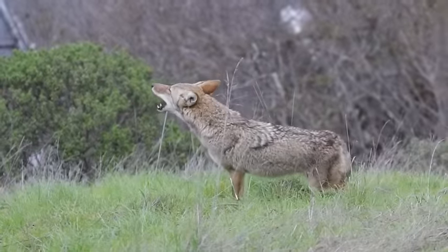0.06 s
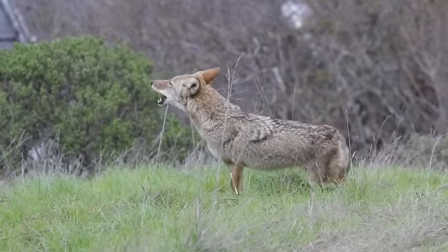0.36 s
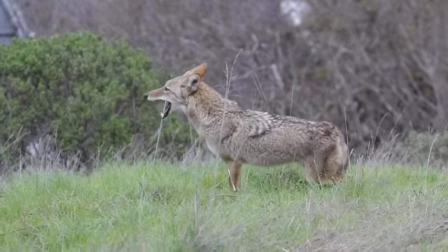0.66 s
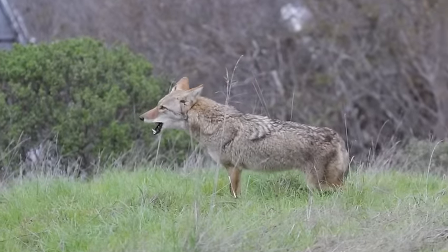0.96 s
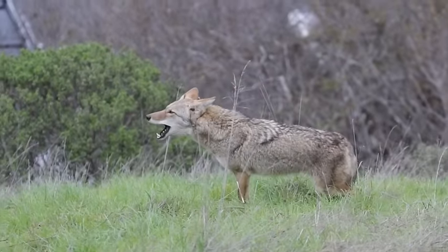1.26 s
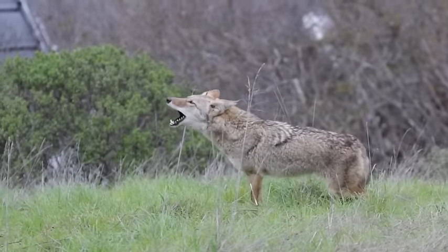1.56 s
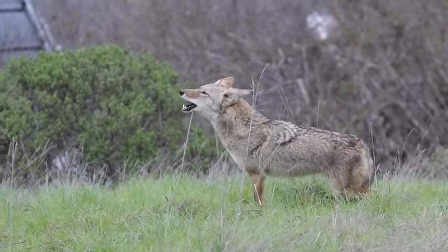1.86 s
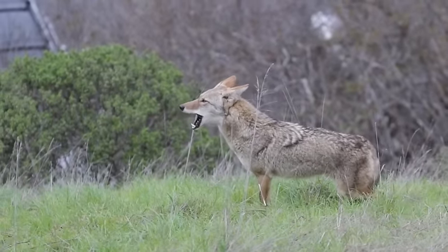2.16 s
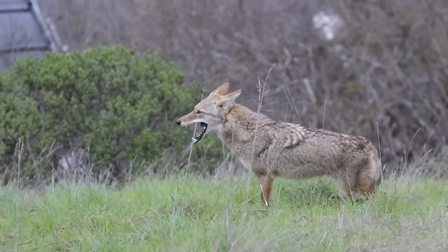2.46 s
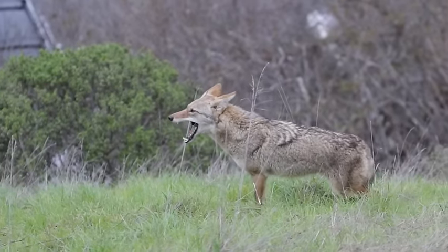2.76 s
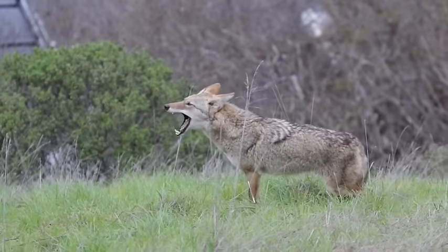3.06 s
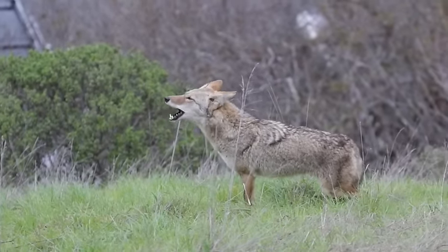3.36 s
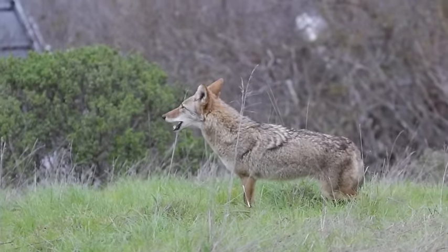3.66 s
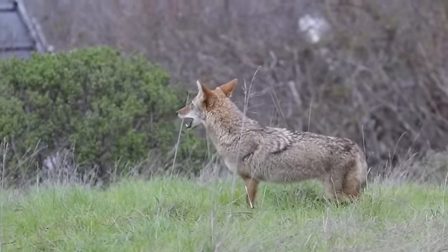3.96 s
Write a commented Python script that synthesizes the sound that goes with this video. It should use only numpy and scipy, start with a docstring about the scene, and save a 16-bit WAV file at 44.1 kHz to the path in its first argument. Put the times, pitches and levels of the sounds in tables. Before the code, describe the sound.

Two coyotes call in a meadow. The near one slides again and again from low howls up into high, arching yips, while the other holds lower, wavering, sometimes raspy howls. Trees return a soft echo over faint background noise.

```python
"""Two coyotes in a meadow

The near one slides from low howls up into pure, arched yips that break downwards; its partner holds
lower, wavering howls, some beginning in a rasp. Each voice is a stack of harmonics from the vocal
folds, coloured by throat and mouth, with breathy growls and thin squeaks. Trees return a soft echo,
a few dry ticks sound close by, and a far wail, a low rumble and a faint hum lie underneath."""
import sys
import numpy as np
from scipy import signal
from scipy.fft import rfft, irfft
from scipy.io import wavfile
from scipy.ndimage import uniform_filter1d

SR = 44100
rng = np.random.default_rng(int(sys.argv[2]) if len(sys.argv) > 2 else 0)


def generate_wav(sig):
    """Save sig (samples, or channels by samples) to the path in sys.argv[1] as 16-bit PCM at SR."""
    pcm = np.round(np.clip(np.atleast_2d(sig).T, -1, 1) * 32767).astype(np.int16)
    wavfile.write(sys.argv[1], SR, pcm)


N = 176400
T = np.arange(N) / SR
CUTOFF_HZ = 15850


def from_db(db):
    """Decibels to gain."""
    return 10 ** (np.asarray(db) / 20)


def rms_one(x):
    """Scale to unit power."""
    return x / np.sqrt(np.mean(x ** 2) + 1e-20)


def at_hz(colour, hz):
    """Read an EQ curve in dB on a log-frequency axis."""
    f, db = np.transpose(colour)
    return np.interp(np.log(hz + 1e-9), np.log(f), db)


def noise(colour):
    """Unit-power noise through an EQ curve, rolled off beyond its ends."""
    hz = np.arange(N // 2 + 1) * SR / N
    roll_off = np.minimum(hz / colour[0][0], 1) ** 2 / np.maximum(hz / colour[-1][0], 1) ** 4
    return rms_one(irfft(rfft(rng.standard_normal(N)) * from_db(at_hz(colour, hz)) * roll_off, N))


def drift(rate_hz):
    """Random modulator of spread 1, up to a given rate."""
    hz = np.arange(N // 2 + 1) * SR / N
    return rms_one(irfft(rfft(rng.standard_normal(N)) / (1 + (hz / rate_hz) ** 4), N))


def gate(start, end, edge_s):
    """One between two times, with soft edges."""
    return np.clip(np.minimum(T - start, end - T) / edge_s + .5, 0, 1)


def glide(times, values, t):
    """A control curve with rounded corners."""
    return uniform_filter1d(np.interp(t, times, values), size=220, mode="nearest")


def phase_of(hz):
    """Running phase of an oscillator that follows a pitch curve."""
    return 2 * np.pi * np.cumsum(hz) / SR


# EQ of the rumble and of the open air: f/Hz, level/dB
RUMBLE_EQ = [(15, -65), (25, -25.5), (64, -3), (161, 0.5), (210, -2), (349, -2), (450, -16), (580, -60),
             (990, -120)]
AIR_EQ = [(200,-14.5),(450,-1.5),(1200,7),(2000,-3),(3500,-14.5),(4300,-27),(7000,-29),(10000,-35.5),(15500,-37)]
def background(rumble_db=-42, hum_hz=166, hum_db=-52.5, air_db=-37):
    """The bed: distant rumble, a wavering hum and the hiss of open air."""
    hum = np.sqrt(2) * np.sin(phase_of(hum_hz + 3 * drift(1.8)))
    hum *= 1 + 0.6 * drift(1.2)
    return from_db(rumble_db) * noise(RUMBLE_EQ) + from_db(hum_db) * hum + from_db(air_db) * noise(AIR_EQ)


# Contour of the wail: t/s, f/Hz, level/dB
WAIL_CONTOUR = [(0.601,1398,-30.5),(1.35,1586,-37),(1.7,1685,-34.5),(1.969,1645,-29.5),(2.618,1338,-33.5),(2.998,1205,-36.5),(3.298,1080,-40.5),(4,952,-28.5)]
def far_wail():
    """One slow tone, blurred and fading in and out over the distance."""
    times, hz, db = np.transpose(WAIL_CONTOUR)
    phase = phase_of(np.interp(T, times, hz))
    blurred = drift(34) * np.sin(phase) + drift(3.3) * np.cos(phase)
    return gate(times[0], np.inf, edge_s=.2) * from_db(np.interp(T, times, db)) * blurred


# Tick cues: t/s, level/dB
TICK_CUES = [(0.29,-15.5),(0.3181,-11.5),(0.695,-14),(0.717,-17.5)]
# EQ of a tick: f/Hz, level/dB
TICK_EQ = [(1000,-21),(2500,9),(4000,-4.5),(6000,-3),(9000,-5),(15000,-27)]
def ticks(decay_s=0.00094):
    """Bright snaps of noise with an instant attack and a very short decay."""
    envelope = sum(from_db(db) * (T >= t) * np.exp(-np.abs(T - t) / decay_s) for t, db in TICK_CUES)
    return noise(TICK_EQ) * envelope


# EQ of the echo tail: f/Hz, level/dB
ECHO_EQ = [(300,0),(700,-2),(1300,-5.5),(1900,-1.5),(2600,-4.5),(3600,-7),(5000,2),(12000,-11)]
def tree_echo(voices, wet_db=-23.5, t60_s=2, build_s=0.0083):
    """Scattered echoes from the edge of the wood swell and die away."""
    tail = noise(ECHO_EQ) * from_db(-60 * T / t60_s) * (1 - np.exp(-T / build_s))
    return from_db(wet_db) * signal.fftconvolve(voices, rms_one(tail) / np.sqrt(N))[:N]


# Squeak cues: start t/s, end t/s, first f/Hz, last f/Hz, level/dB
SQUEAK_CUES = [(0.903,0.991,4950,4510,-50), (2.274,2.553,7697,7270,-64), (2.927,3.02,6766,6400,-49.5),
               (3.805,3.838,5226,6680,-40.5)]
def squeaks(octave_db=-2.5, flicker_db=9.0):
    """A second, whistling pitch slides high above the howls; the lower squeaks carry an octave."""
    waver = 1 + 0.0037 * drift(100)
    out = np.zeros(N)
    for start, end, first_hz, last_hz, db in SQUEAK_CUES:
        phase = phase_of(np.interp(T, [start, end], [first_hz, last_hz]) * waver)
        octave = from_db(octave_db) * (last_hz < 6000) * np.sin(2 * phase)
        out += gate(start, end, edge_s=0.021) * from_db(db) * (np.sin(phase) + octave)
    return out * from_db(flicker_db * drift(30))


# Growl cues: start t/s, end t/s, level/dB, pulse f/Hz, sizzle trim/dB
GROWL_CUES = [(0.591,0.949,-31.5,140,2),(0.984,1.031,-26,150,-13.5),(1.123,1.143,-21.5,206,-11),(1.625,1.694,-34.5,133,5),(1.87,1.946,-16.5,150,-2),(3.384,3.425,-19.5,220,3)]
# EQ of the growl's body and of the sizzle on top: f/Hz, level/dB
GROWL_EQ = [(400,-17),(650,-2.5),(900,-17),(1150,2.5),(1400,-2.5),(1750,-0.5),(2050,-7.5),(2500,-37),(3600,-37.5)]
SIZZLE_EQ = [(4600,-20),(5700,8.5),(6900,-9),(8000,-18),(9500,-20),(13000,-28)]
def growls(throb_depth=0.28, sizzle_db=-27):
    """Slow, uneven flaps of the folds let puffs of air through the throat."""
    body, sizzle = noise(GROWL_EQ), noise(SIZZLE_EQ)
    uneven = 1 + 0.1182 * drift(64.3)
    out = np.zeros(N)
    for start, end, db, pulse_hz, trim_db in GROWL_CUES:
        puffs = 1 + throb_depth * np.cos(phase_of(pulse_hz * uneven))
        air = body + from_db(sizzle_db + trim_db) * sizzle
        out += gate(start, end, edge_s=0.036) * from_db(db) * puffs * air
    return out


FALSETTO_HZ, TREBLE_HZ, PURITY_DB_PER_OCTAVE = 1100, 3900, -3.5
RASP_EDGE_S, RASP_JITTER, RASP_THROB = 0.0098, 0.077, 0.58
FLUTTER_DB, SHIMMER_DB, BLUR_RAD, BREATH_DB = 5, 1.5, 0.31, -42
BREAK_HZ_PER_S, BREAK_MID_DB, BREAK_TREBLE_DB = 10000, 6.5, 2.5
# EQ of the air in the throat and of the breathy edge over the voice: f/Hz, level/dB
HISS_EQ = [(300,-50.5),(700,-8),(1300,24),(1900,-15.5),(2600,3.5),(3600,-8.5),(4400,-45),(6500,-17),(9500,-19),(15000,-62.5)]
BREATH_EQ = [(4600,-25),(5600,-8),(6700,3.5),(7800,-3.5),(9800,-8),(11000,-24.5),(15500,-26)]
def coyote_voice(calls, presses, rasps, throat, overtone_ride,
                 level_db, upper_db, tilt_db_per_octave, falsetto_db, jitter, hiss_db):
    """Vocal folds give a harmonic stack; in a rasp they jitter and throb every third cycle."""
    rough = np.clip(sum(amount * gate(start, end, RASP_EDGE_S) for start, end, amount, _ in rasps), 0, 1)
    fader_db = level_db + sum(db * gate(start, end, RASP_EDGE_S) for start, end, _, db in rasps)
    wobble = 1 + (jitter + RASP_JITTER * rough ** 2) * drift(269)
    flutter = [FLUTTER_DB * drift(19) for _ in range(7)]
    shimmer = [SHIMMER_DB * drift(200) for _ in range(3)]
    blur = [BLUR_RAD * drift(280) for _ in range(5)]
    breath = from_db(BREATH_DB) * noise(BREATH_EQ)
    hiss = from_db(hiss_db) * noise(HISS_EQ)
    throb_slip = drift(40)
    out = np.zeros(N)
    for call, (press_mid_db, press_treble_db) in zip(calls, presses):
        times, *curves = np.transpose(call)
        fade = gate(times[0], times[-1], edge_s=.006)
        on = fade > 0
        hz, fundamental_db, octave_db = (glide(times, curve, T[on]) for curve in curves)
        phase = phase_of(hz * wobble[on])
        effort = np.hypot(from_db(fundamental_db), from_db(octave_db))
        airflow = effort * (1 + np.cos(phase))  # one puff per cycle
        falsetto = 1 / (1 + (FALSETTO_HZ / hz) ** 8)
        tilt = tilt_db_per_octave + PURITY_DB_PER_OCTAVE * falsetto  # steeper in falsetto
        # A fast downward break of pitch brightens the voice.
        breaking = np.clip(-np.gradient(hz) * SR / BREAK_HZ_PER_S, 0, 1)
        mid_db = press_mid_db + np.interp(T[on], *np.transpose(overtone_ride)) + BREAK_MID_DB * breaking
        treble_db = press_treble_db + BREAK_TREBLE_DB * breaking
        voice = from_db(fundamental_db) * np.sin(phase) + from_db(octave_db) * np.sin(2 * phase)
        voice += airflow * breath[on] * (1 - falsetto) * (1 + breaking)
        for k in range(3, 25):
            treble = 1 / (1 + (TREBLE_HZ / (k * hz)) ** 12)  # crossover: 0 in the mids, 1 on top
            db = upper_db + falsetto_db * falsetto + at_hz(throat, k * hz) + tilt * np.log2(k / 3)
            db += flutter[k % 7][on] + mid_db * (1 - treble) + (treble_db + shimmer[k % 3][on]) * treble
            gain = effort * from_db(np.minimum(db, 0)) * (k * hz < CUTOFF_HZ)
            smear = treble * blur[k % 5][on] * (1 + breaking)
            voice += gain * np.sin(k * phase + smear)
        throb = 1 + RASP_THROB * rough[on] * np.cos(phase / 3 + throb_slip[on])
        out[on] += fade[on] * (np.sqrt(2) * voice * throb + airflow * hiss[on])
    return out * from_db(fader_db)


# The partner's howls: t/s, f/Hz, fundamental level/dB, octave level/dB
REPLY_1 = [(0.07, 615, -35, -25), (0.1, 682.4, -47, -22.5), (0.168, 672.7, -25.5, -25),
           (0.21, 831.7, -40.5, -30.5), (0.258, 724.7, -32, -20.5), (0.31, 798.5, -34, -21),
           (0.34, 863.5, -24.5, -19.5), (0.372, 771, -23.5, -25), (0.45, 747.4, -23, -23.5),
           (0.464, 782, -23, -20), (0.48, 925, -29.5, -13.5), (0.5, 917, -24.5, -18.5),
           (0.512, 915, -28, -15), (0.52, 796, -20, -18), (0.546, 817, -23, -20.5),
           (0.556, 721.5, -45.5, -25), (0.632, 721, -37.5, -36.5), (0.65, 714, -43, -21)]
REPLY_2 = [(0.6, 483, -48, -42.5), (0.633, 468.8, -38.5, -30), (0.646, 537.8, -29.5, -49),
           (0.656, 525.5, -31.5, -24), (0.669, 520.2, -45, -39.5), (0.693, 479, -35.5, -30),
           (0.768, 491.5, -42, -28), (0.789, 549.3, -35.5, -42.5), (0.813, 496, -41, -30),
           (0.834, 499, -49, -41), (0.848, 551.7, -38.5, -32.5), (0.882, 568.7, -40, -26.5),
           (0.918, 600.6, -38.5, -33), (0.937, 550, -35.5, -23.5), (0.978, 597, -30.5, -23),
           (0.996, 701, -46, -17), (1.023, 679.6, -47, -18), (1.064, 636, -36, -28.5),
           (1.085, 624.3, -36, -15), (1.14, 458.2, -51, -30)]
REPLY_3 = [(2.072, 621, -34.5, -22), (2.082, 587.8, -33.5, -23.5), (2.13, 578.7, -45, -31),
           (2.184, 608.6, -45.5, -20.5), (2.223, 663.4, -24.5, -22.5), (2.271, 517.6, -37.5, -25),
           (2.31, 484, -47.5, -39), (2.354, 543.6, -43, -35.5), (2.364, 515, -46, -34),
           (2.383, 548, -38, -27.5), (2.4, 586, -35, -44), (2.434, 589.6, -39.5, -30),
           (2.487, 629, -35, -35.5), (2.511, 626, -40, -19), (2.57, 440, -57.5, -41.5)]
REPLY_4 = [(3.36, 475.3, -42, -39), (3.392, 574, -40, -26.5), (3.414, 666.5, -26.5, -25.5),
           (3.496, 761.2, -32, -21), (3.545, 814.6, -22.5, -19.5), (3.605, 892, -29.5, -24.5),
           (3.672, 951, -36, -38), (3.798, 848.5, -23.5, -24.5), (3.848, 888, -22.5, -26),
           (3.888, 985, -20.5, -34), (3.932, 1101, -24, -45), (3.957, 966, -49, -54),
           (3.989, 889, -38, -31), (4.0, 899, -16, -41)]
# How hard each howl is pressed: mid level/dB, treble level/dB
PARTNER_PUSH = [(6,1.5),(-11.5,7.5),(-4,-11),(4.5,-22)]
# Rasp cues: start t/s, end t/s, roughness/0-1, level/dB
PARTNER_RASP_CUES = [(0.598,0.95,0.94,1), (0.987,1.033,0.8,2.5), (3.368,3.411,0.55,1)]
# Throat and mouth EQ on the upper partials: f/Hz, level/dB
PARTNER_EQ = [(1200,7.5),(1800,-2.5),(2400,-16),(3000,-24),(3800,-37.5),(4600,-66),(5700,-35.5),(7000,-24),(8000,-36),(10000,-36),(12000,-63.5),(15500,-73)]
# Dip and lift of the mid overtones: t/s, level/dB
PARTNER_RIDE = [(.97,-1),(1.01,-11.5),(1.051,6.5),(2.0,0.5),(2.09,18.5),(2.17,20),(2.26,-2)]
def partner_coyote():
    """Lower, wavering howls with more jitter in the folds and more air in the throat."""
    howls = [REPLY_1, REPLY_2, REPLY_3, REPLY_4]
    return coyote_voice(howls, PARTNER_PUSH, PARTNER_RASP_CUES, PARTNER_EQ, PARTNER_RIDE,
                        level_db=1, upper_db=-0.5, tilt_db_per_octave=-10.5, falsetto_db=12,
                        jitter=0.0051, hiss_db=-23.5)


# The near coyote's calls: t/s, f/Hz, fundamental level/dB, octave level/dB
YIP_A = [(0.0, 1760, -5.5, -55.5), (0.02, 1790, -17.5, -33.5), (0.026, 1667, -9, -45),
         (0.032, 1260, -18, -24.5), (0.04, 1137, -14, -24), (0.05, 814, -35.5, -18),
         (0.07, 602, -30, -24.5)]
HOWL_A = [(0.074, 572.5, -42, -27.5), (0.109, 575.6, -37.5, -21.5), (0.141, 664.4, -22.5, -17),
          (0.178, 687.5, -19, -36), (0.194, 690.3, -15, -29), (0.264, 745.7, -19.5, -26.5),
          (0.349, 886.6, -26, -29.5), (0.361, 997, -21.5, -20.5), (0.385, 1019, -23.5, -20.5),
          (0.425, 824, -20.5, -19), (0.436, 625, -33, -17), (0.46, 476, -46.5, -35)]
RISE_A = [(0.62, 722, -48.5, -33.5), (0.636, 699, -42.5, -16.5), (0.652, 817.6, -14.5, -18.5),
          (0.674, 826.5, -21, -12), (0.687, 982, -26, -17.5), (0.713, 909, -23.5, -23),
          (0.749, 1089, -21, -24.5), (0.761, 1368, -22, -22.5), (0.772, 1565, -16.5, -33),
          (0.789, 1676, -12.5, -30), (0.803, 1754, -12, -46), (0.834, 1837, -12, -36.5),
          (0.873, 1774, -15, -53.5), (0.893, 1772, -20, -52), (0.905, 1770, -35, -59.5)]
YIP_B = [(1.11, 617.6, -43.5, -20.5), (1.121, 643, -22, -32), (1.128, 694, -22, -27.5),
         (1.138, 906, -51.5, -22), (1.148, 1294, -16.5, -27), (1.169, 1273, -16, -26.5),
         (1.182, 1314, -23, -27), (1.189, 1056, -19.5, -17), (1.197, 1110, -29.5, -27.5),
         (1.203, 1456, -19.5, -28), (1.229, 1684, -14.5, -29), (1.261, 1819, -10.5, -26),
         (1.281, 1775, -12.5, -33), (1.291, 1425, -13, -23), (1.311, 692, -36, -19.5),
         (1.336, 480, -80, -42.5)]
YIP_C = [(1.436, 627, -25.5, -48), (1.45, 675, -24, -12.5), (1.467, 1216, -13, -23),
         (1.479, 1257, -10.5, -28), (1.498, 1326, -12.5, -17), (1.52, 1301, -16.5, -22),
         (1.548, 1510, -14.5, -22.5), (1.569, 1551, -12.5, -19), (1.585, 1520, -17.5, -22.5),
         (1.592, 1092, -17, -24.5), (1.601, 923, -18.5, -19.5), (1.613, 859, -29.5, -15),
         (1.619, 694, -30.5, -19), (1.648, 465, -96, -24), (1.71, 373.3, -62, -38)]
HOWL_B = [(1.85, 393.5, -53, -48.5), (1.89, 428.4, -35, -36), (1.91, 497, -42, -44),
          (1.92, 514, -40.5, -38), (1.963, 493, -29, -29.5), (2.016, 601, -26, -16),
          (2.031, 644.3, -22.5, -17.5), (2.057, 627.3, -23.5, -24), (2.074, 624.4, -22.5, -17.5),
          (2.1, 799.5, -26.5, -23.5), (2.126, 762, -21.5, -23), (2.139, 734, -17.5, -24.5),
          (2.179, 572, -46, -20.5)]
RISE_B = [(2.165, 583, -42, -21), (2.205, 609.4, -38, -20.5), (2.257, 814.6, -15.5, -17),
          (2.265, 1030, -38.5, -14.5), (2.285, 1113, -19.5, -14), (2.293, 1440, -13.5, -25.5),
          (2.309, 1495, -13, -23.5), (2.348, 1693, -12, -31), (2.371, 1843, -12, -31),
          (2.403, 1876, -13, -32.5), (2.467, 1798, -18.5, -47), (2.538, 1810, -15, -46.5),
          (2.572, 1836, -33.5, -64)]
RISE_C = [(2.7, 673.6, -49, -49), (2.722, 663.5, -21, -19), (2.777, 821.5, -16.5, -20.5),
          (2.782, 948, -25.5, -11.5), (2.791, 1335, -12, -25.5), (2.82, 1643, -12.5, -20),
          (2.846, 1837, -11, -26.5), (2.866, 1872, -14, -25.5), (2.886, 1785, -14, -30),
          (2.9, 1480, -16.5, -26.5), (2.908, 965, -22.5, -18.5), (2.916, 747, -50.5, -22),
          (2.93, 560, -56, -58)]
YIP_D = [(3.03, 644, -36, -43.5), (3.045, 685, -20.5, -17), (3.056, 1040, -24, -16),
         (3.064, 1250, -8.5, -26), (3.077, 1250, -10.5, -31.5), (3.092, 1201, -14, -29),
         (3.097, 955, -21, -19.5), (3.111, 1153, -17, -23), (3.118, 1380, -14, -19.5),
         (3.15, 1613, -11.5, -25.5), (3.174, 1718, -9.5, -33), (3.191, 1665, -13.5, -26),
         (3.201, 1466, -19.5, -23), (3.206, 1047, -16, -20.5), (3.22, 731, -54, -18.5),
         (3.25, 504, -71.5, -47)]
SHORT_YELP = [(3.49, 724.7, -35, -35), (3.514, 782, -21.5, -33.5), (3.56, 943.6, -42, -13),
              (3.571, 1173, -23.5, -19.5), (3.587, 1224, -38, -22), (3.606, 951, -18.5, -18.5),
              (3.62, 796.5, -40, -27.5), (3.632, 636, -57, -29), (3.65, 513, -53, -29)]
LAST_YIP = [(3.82, 1315, -60, -45), (3.838, 1414, -18.5, -32.5), (3.868, 1436, -17.5, -44),
            (3.924, 1726, -18.5, -53), (3.94, 1787, -12.5, -47), (3.96, 1744, -18, -41),
            (3.964, 1626, -15, -58), (3.974, 1336, -20, -28), (3.986, 950, -30, -17), (4.0, 814, -44, -32)]
# How hard each call is pressed: mid level/dB, treble level/dB
NEAR_PUSH = [(0.5,-0.5),(-5,-5),(4,-4),(7,-2.5),(1.5,-3.5),(1.5,2.5),(3.5,2.5),(4.5,1.5),(5.5,-6),(-1,9.5)]
LAST_PUSH = [(0.014,0.0018)]
# Rasp cues: start t/s, end t/s, roughness/0-1, level/dB
NEAR_RASP_CUES = [(0.434,0.431,0.48,3), (1.13,1.153,0.83,6.5), (1.294,1.332,0.24,0.5), (1.451,1.464,0.7,-1),
                  (1.622,1.706,0.9,-2.5), (1.856,1.922,0.68,3.5), (2.9,2.93,.4,-0.5),
                  (3.022,3.063,0.42,0.5), (3.207,3.25,0.4,0.5), (3.611,3.656,0.36,2.5)]
# Throat and mouth EQ on the upper partials, jaws open and closing: f/Hz, level/dB
OPEN_JAW_EQ = [(1200,-0.5),(1800,2),(2400,-14),(3000,-24.5),(3800,-29.5),(4400,-48),(5400,-38),(6500,-31.5),(8000,-44.5),(9700,-42.5),(11000,-71.5),(15500,-67.5)]
CLOSING_JAW_EQ = [(1800,-6),(3000,-51),(4200,-22.5),(5200,-29.5),(6500,-33.5),(8000,-40),(10000,-32.5),(12000,-54),(15500,-61)]
# Dip of the mid overtones in the low howl: t/s, level/dB
NEAR_RIDE = [(1.96,1),(1.989,-3.5),(2.06,-6),(2.1,-13),(2.19,-11),(2.25,-0.5)]
def near_coyote():
    """The lead: howls rise into pure falsetto yips, the last one coloured by closing jaws."""
    tone = dict(level_db=0.5, upper_db=-2, tilt_db_per_octave=-3.5, falsetto_db=0,
                jitter=0.0021, hiss_db=-40)
    calls = [YIP_A, HOWL_A, RISE_A, YIP_B, YIP_C, HOWL_B, RISE_B, RISE_C, YIP_D, SHORT_YELP]
    phrase = coyote_voice(calls, NEAR_PUSH, NEAR_RASP_CUES, OPEN_JAW_EQ, NEAR_RIDE, **tone)
    last = coyote_voice([LAST_YIP], LAST_PUSH, NEAR_RASP_CUES, CLOSING_JAW_EQ, NEAR_RIDE, **tone)
    return phrase + last


def scene():
    """Mono mix of both coyotes over the meadow; only the voices feed the echo."""
    voices = near_coyote() + partner_coyote() + growls() + squeaks()
    return (voices + tree_echo(voices) + far_wail() + ticks() + background())[None]


def record(dry):
    """A steep high cut on the whole mix."""
    return signal.sosfilt(signal.ellip(10, .1, 80, CUTOFF_HZ, fs=SR, output="sos"), dry)


dry = scene()
out = record(dry)
generate_wav(out)
```